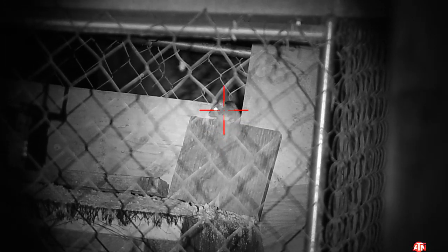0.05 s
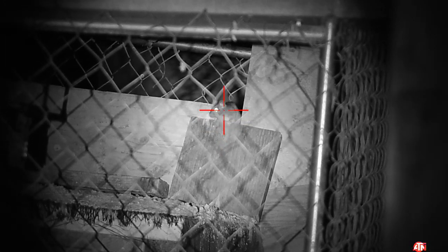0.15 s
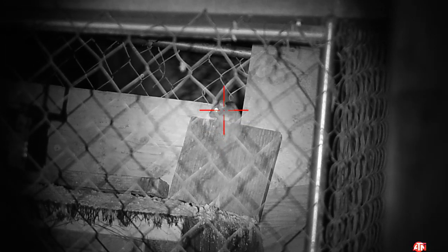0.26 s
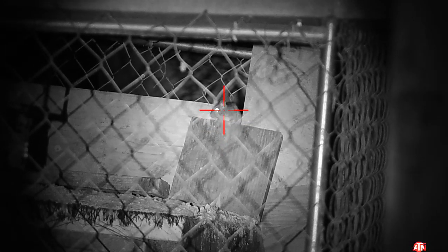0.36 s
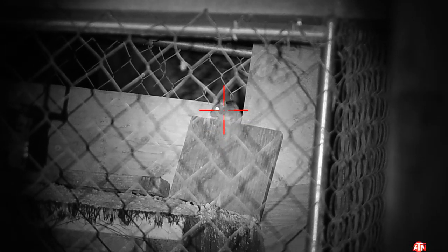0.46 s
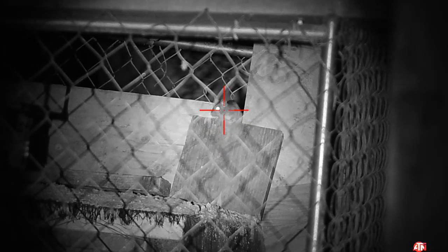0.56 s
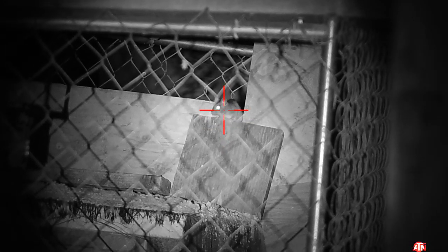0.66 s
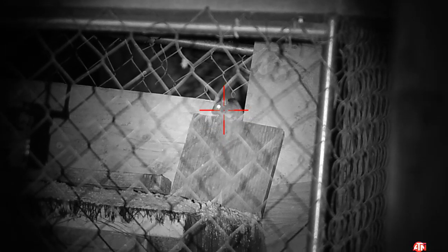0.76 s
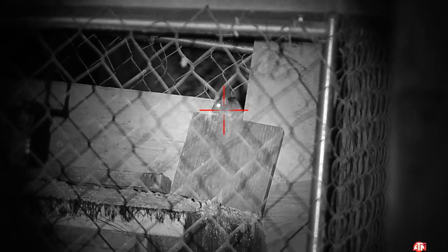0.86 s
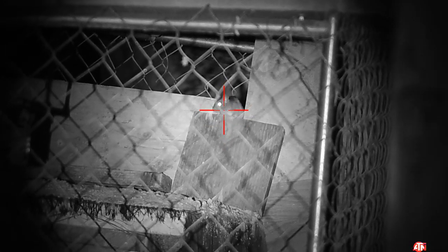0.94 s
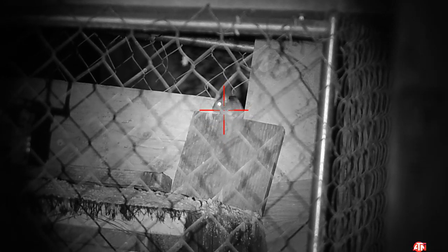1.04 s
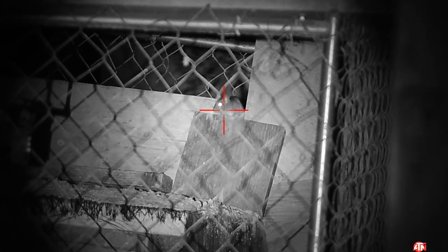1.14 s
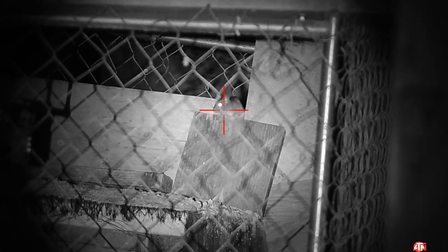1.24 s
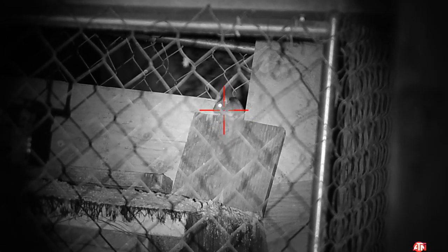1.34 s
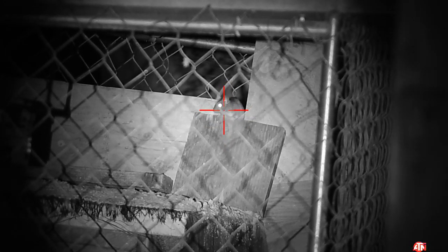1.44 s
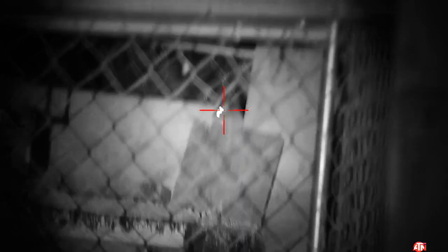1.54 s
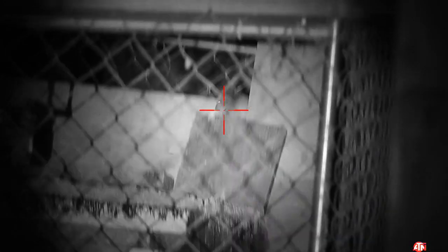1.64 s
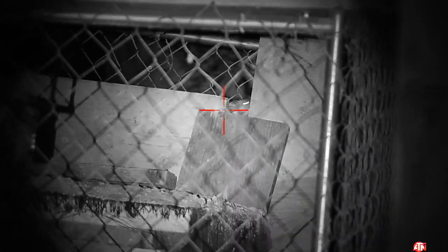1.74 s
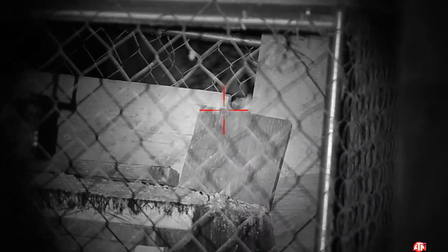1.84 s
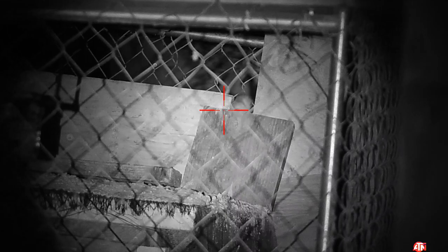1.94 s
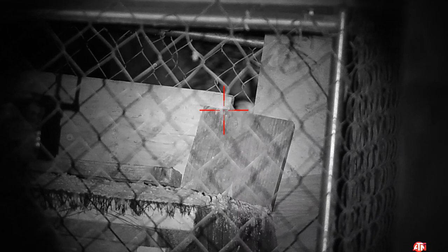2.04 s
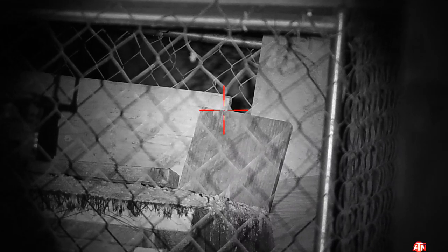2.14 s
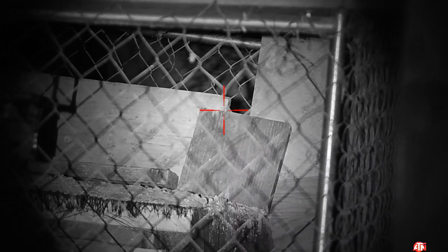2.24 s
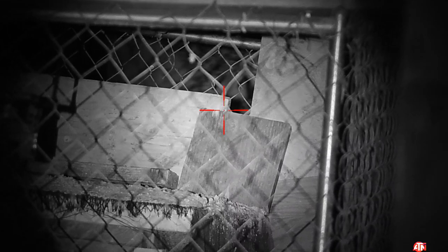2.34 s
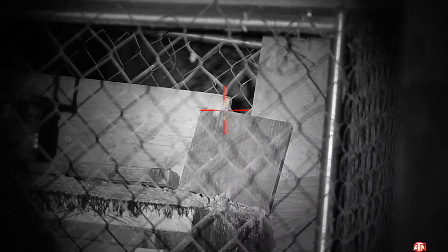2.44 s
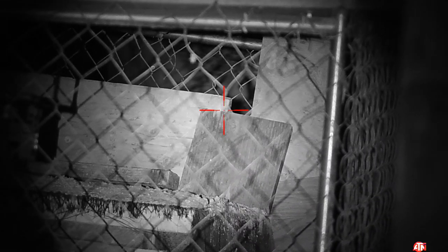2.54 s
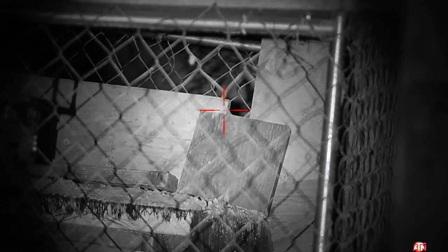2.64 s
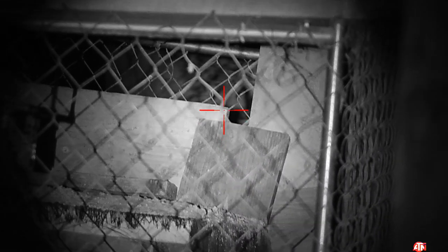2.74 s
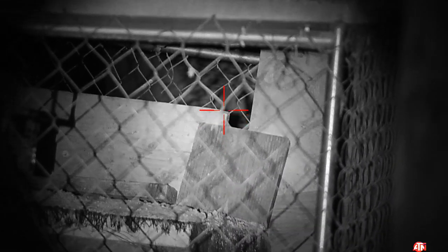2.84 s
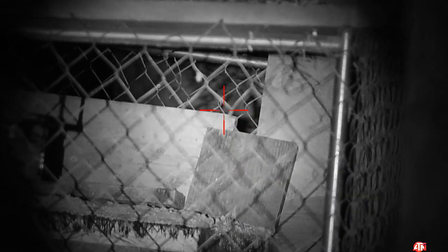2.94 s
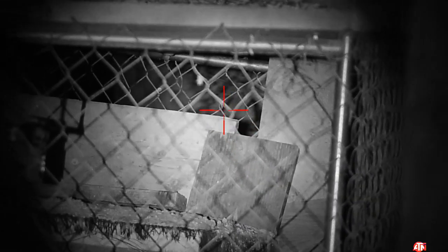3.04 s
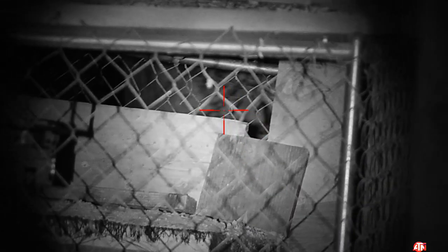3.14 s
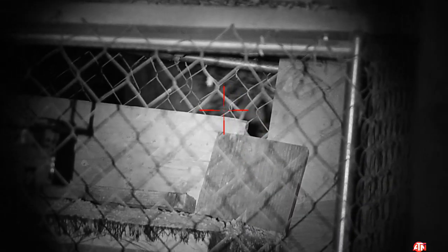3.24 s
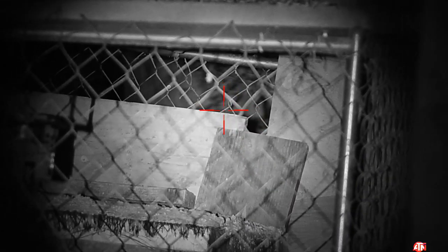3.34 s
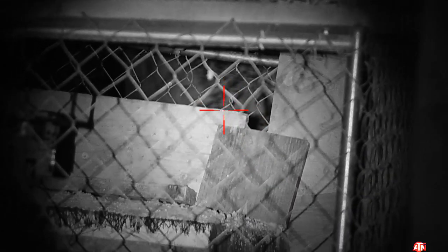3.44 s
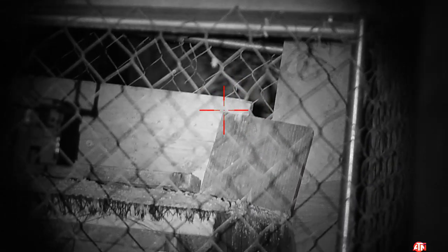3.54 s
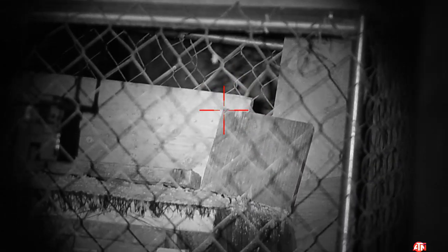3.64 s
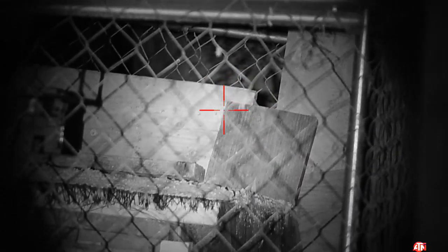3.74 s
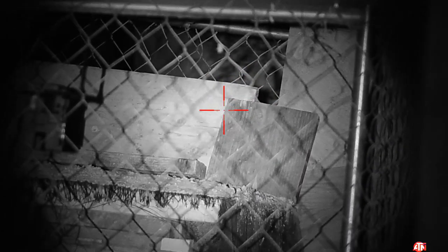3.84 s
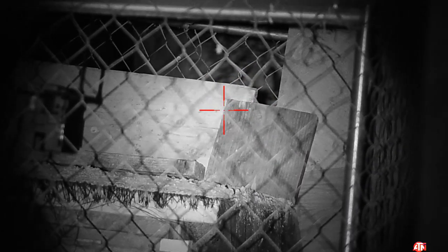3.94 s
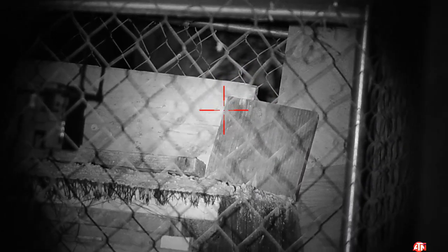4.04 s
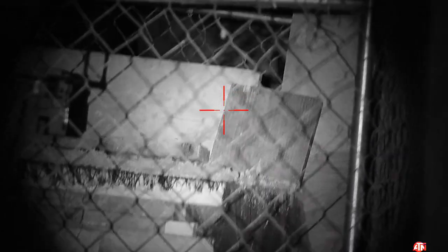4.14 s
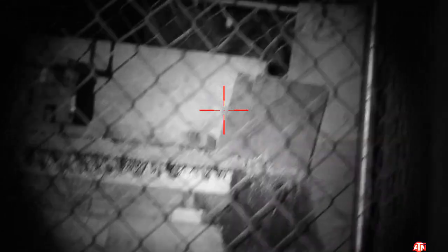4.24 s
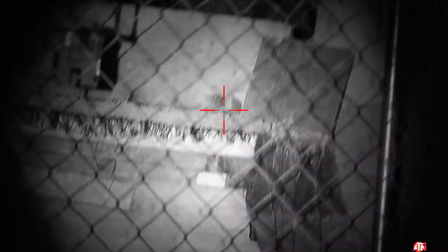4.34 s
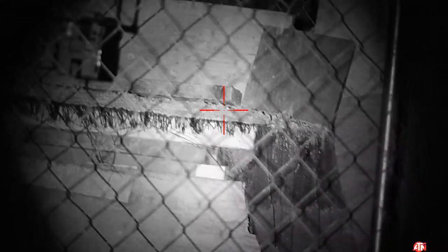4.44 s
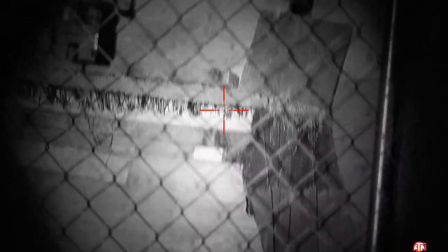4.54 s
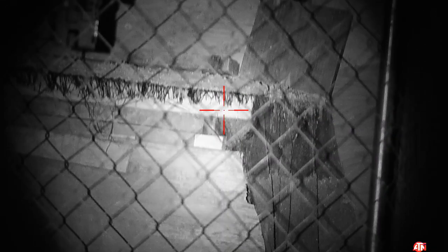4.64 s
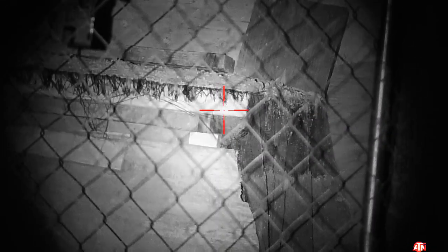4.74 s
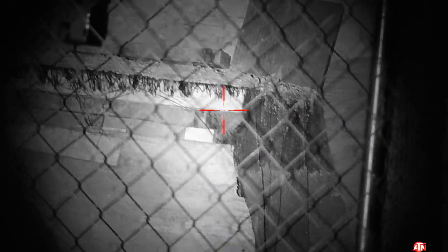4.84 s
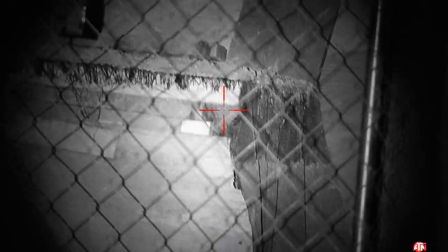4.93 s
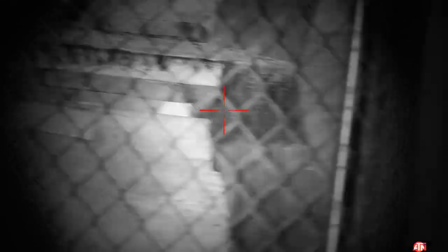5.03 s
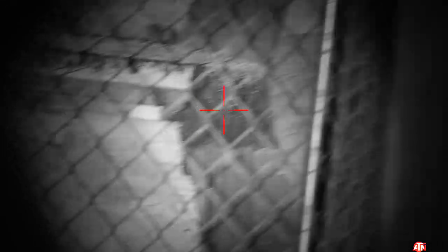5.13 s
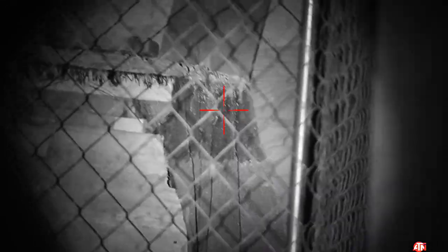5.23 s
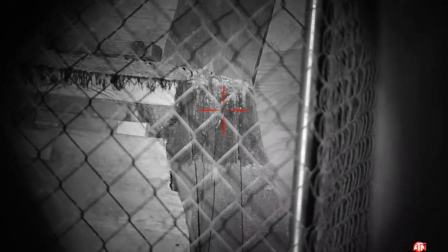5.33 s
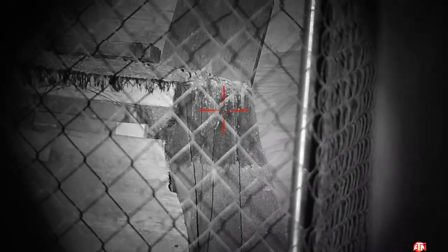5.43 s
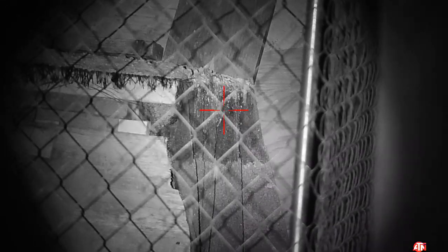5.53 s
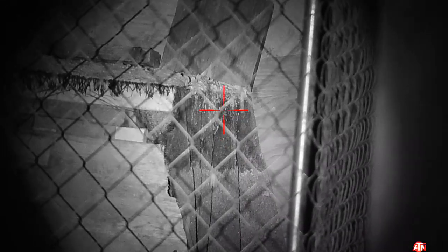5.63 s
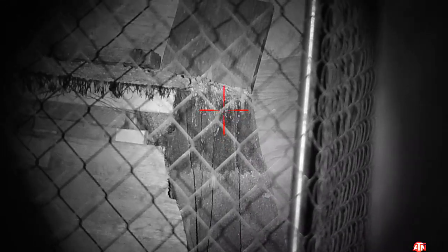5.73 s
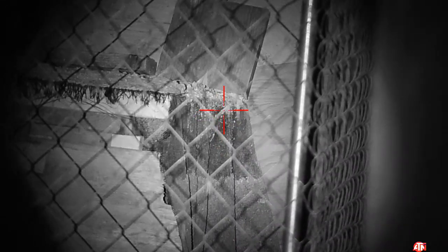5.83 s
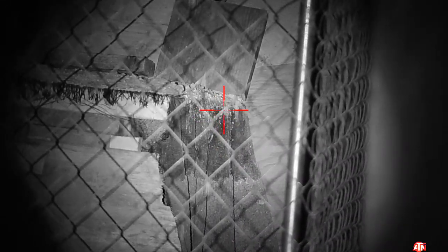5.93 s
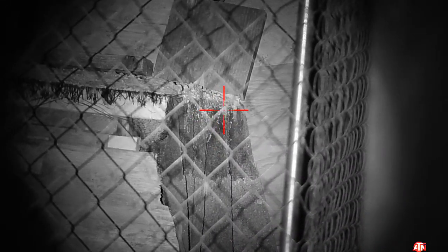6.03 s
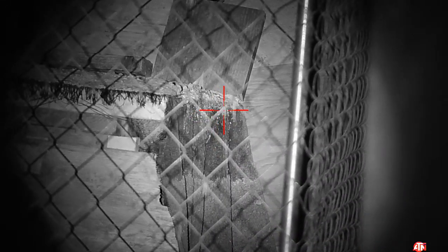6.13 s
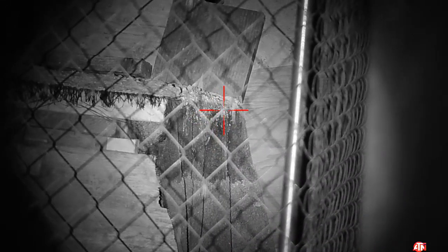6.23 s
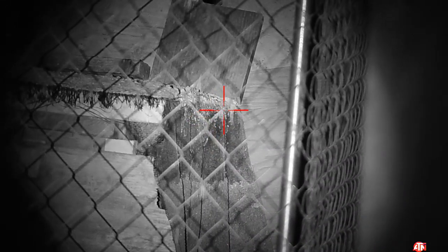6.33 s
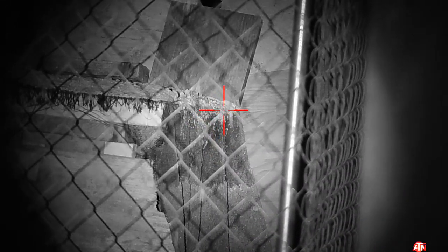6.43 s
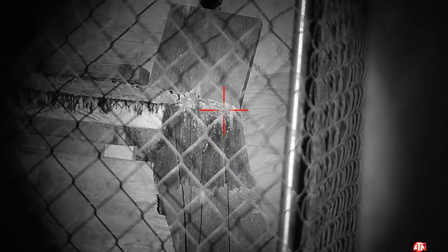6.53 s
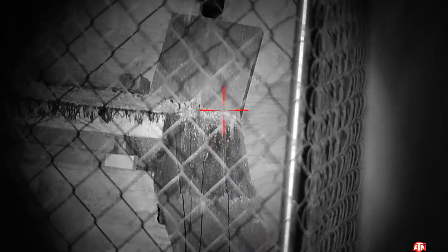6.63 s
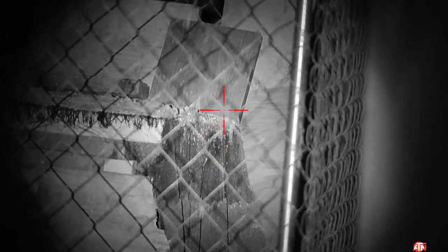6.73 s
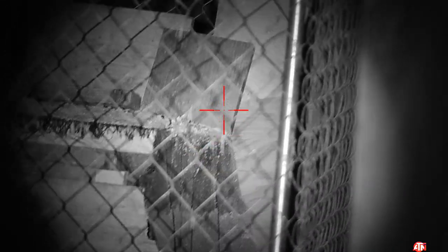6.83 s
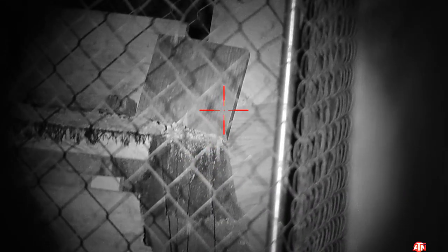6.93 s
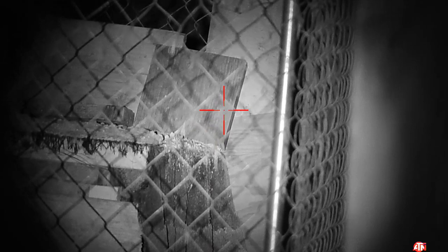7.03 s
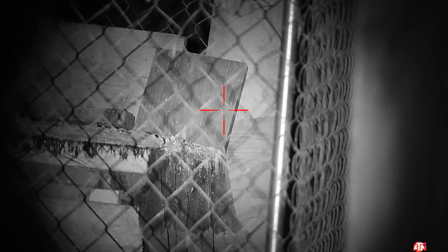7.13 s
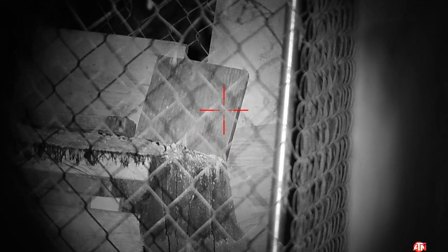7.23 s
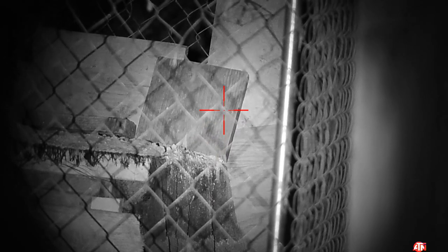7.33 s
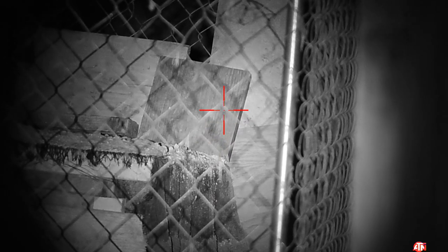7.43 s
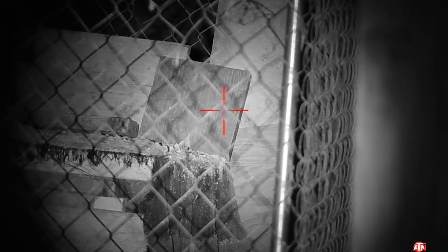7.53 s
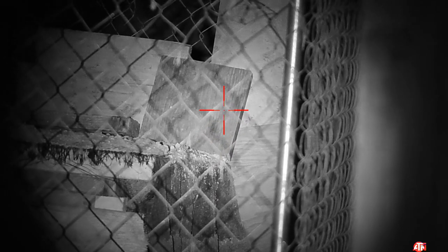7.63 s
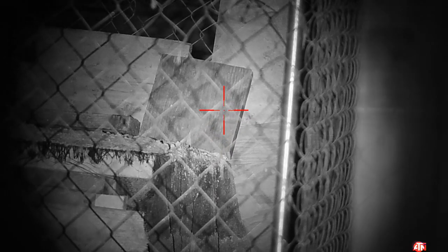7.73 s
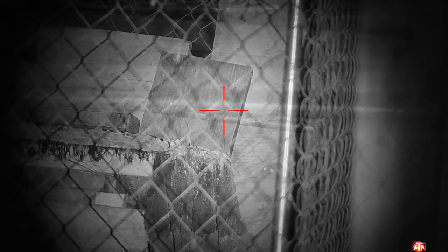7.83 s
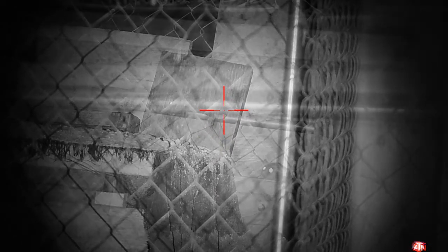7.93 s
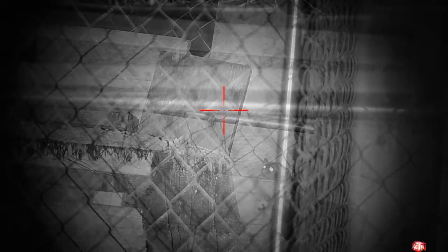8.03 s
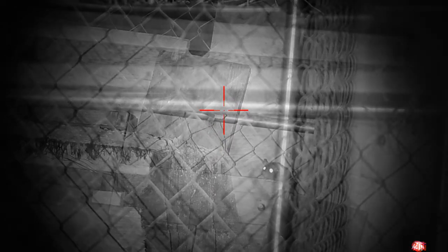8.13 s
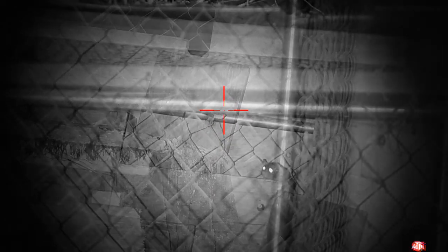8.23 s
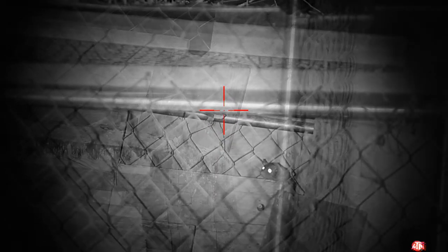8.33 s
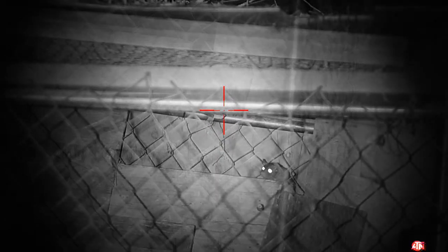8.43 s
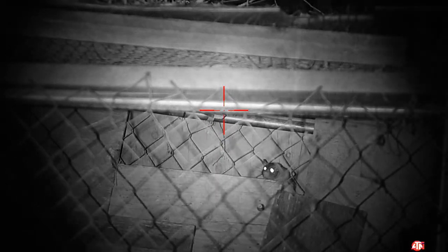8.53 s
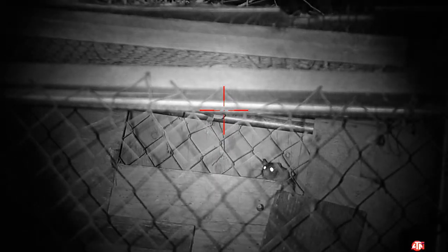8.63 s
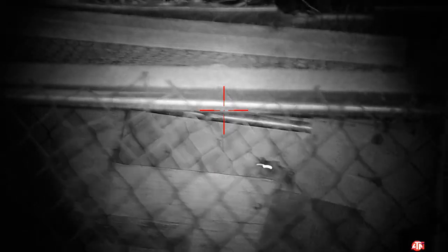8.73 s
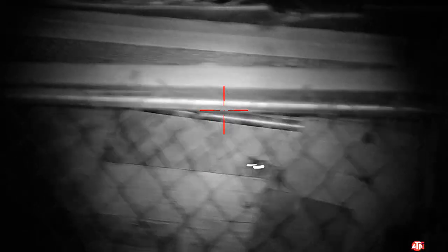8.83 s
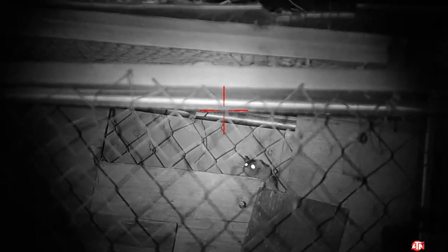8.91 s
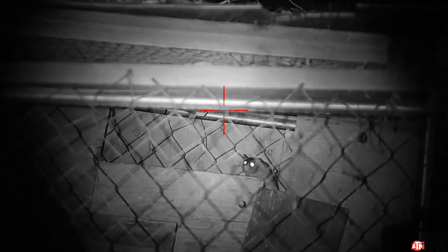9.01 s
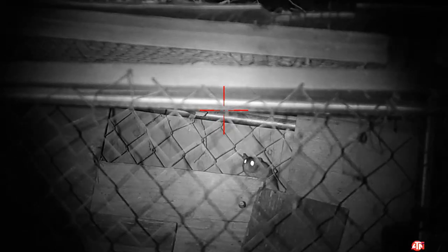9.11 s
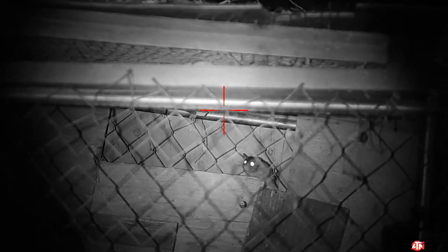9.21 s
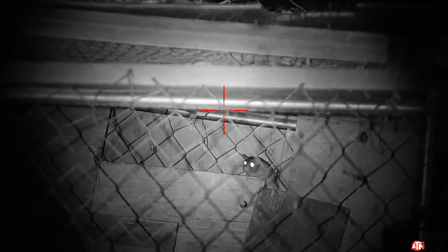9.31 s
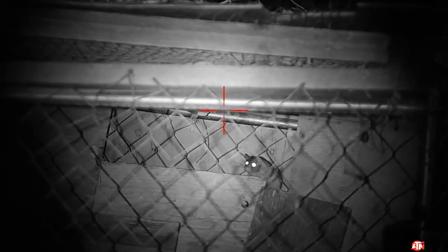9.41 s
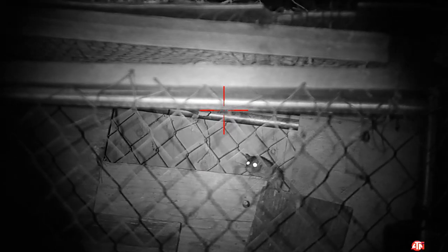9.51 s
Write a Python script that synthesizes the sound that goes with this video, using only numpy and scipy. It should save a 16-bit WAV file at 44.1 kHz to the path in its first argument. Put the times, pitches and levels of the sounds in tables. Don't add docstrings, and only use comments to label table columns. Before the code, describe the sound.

A farm yard at night, full of insects from start to finish, about 9.5 seconds. Crickets give short, bright, toned chirps at various distances; high trills run unbroken, a lower tree cricket pulses roughly every 0.4 seconds, and katydids rasp in dry, even, hissy strokes. Tiny handling taps occur at 0.2 to 0.6 seconds. A faint trigger creep and squeak at 1.65 lead to a single close air rifle shot at 1.71: a hard, bassless, metallic snap, with spring rattle until about 1.77. The microphone's limiter chops it short, then opens: echo and wall slaps swell around 2.1 with low and higher metallic ringing, and a weak ricochet whine at 2.3. By 2.7 the echo is gone. Insects continue over soft hiss and a distant blurred chorus, with faint low bumps and breeze near 5.2 and 5.8, and stronger nearby cricket chirps around 8.4 and 9.3.

```python
import sys
import numpy as np
from scipy import signal
from scipy.fft import rfft, irfft
from scipy.io import wavfile

SR = 44100
rng = np.random.default_rng(int(sys.argv[2]) if len(sys.argv) > 2 else 0)


def wav_out(sig):
    wavfile.write(sys.argv[1], SR, np.round(np.clip(np.atleast_2d(sig).T, -1, 1) * 32767).astype(np.int16))


def how_loud(loudness_db):
    steps = np.asarray(loudness_db, float) / 20
    return 10 ** steps


N = 422037

# (time [s], peak level [dB], pitch [Hz], t60 [s], noise share [0-1])
SHOT_BLOWS = [(1.7106, -17, 6600, 0.006014, 0.7), (1.7106, -19, 3700, .006, .6),
              (1.7135, -15, 3250, .008, .4), (1.7119, -8, 746, 0.0066, .05),
              (1.7122, -9.5, 1420, 0.0047, 0), (1.7124, -12.5, 5750, 0.0073, .2),
              (1.7126, -11.5, 2500, .006, .4), (1.713, -10.5, 4150, .015, .1),
              (1.7121, -8.5, 4900, 0.017, 0.33), (1.7128, -8, 7360, .008, .05),
              (1.714, -9, 7360, .007, .05), (1.7123, -16, 9700, 0.016, 1), (1.7188, -19.5, 750, 0.0082, .1),
              (1.7184, -15.5, 3200, .01, 0.7), (1.7182, -11, 4300, 0.0087, .15),
              (1.7196, -15, 4400, .009, .15), (1.719, -19, 1750, .007, .3), (1.7128, -17.5, 2100, .007, .4),
              (1.7134, -13.5, 5900, .008, .3), (1.7184, -10, 5740, 0.0073, 0), (1.7184, -23, 8800, .01, .9)]
# (time [s], peak level [dB])
SPRING_RATTLES = [(1.731, -31), (1.739, -27), (1.745, -31), (1.75, -27), (1.755, -26), (1.76, -27),
                  (1.767, -32), (1.7692, -30), (1.7712, -30), (1.7732, -30)]
# (time [s], peak level [dB], pitch [Hz],
# t60 [s], noise share [0-1])
HANDLING_TAPS = [(1.922, -29, 4380, .02, .4), (1.764, -32, 5900, .012, .7), (.192, -49, 2040, .022, .4),
                 (.192, -54, 1100, .022, .4), (.192, -54, 2850, .015, .6), (.206, -59, 1100, .03, .4),
                 (.205, -61, 1800, .025, .5), (.223, -62, 1100, .02, .6), (.461, -62, 1000, .025, .5),
                 (.562, -65, 1000, .03, .5), (.555, -64, 2800, .02, .9), (.442, -61, 1000, .035, .6),
                 (.442, -60, 2020, .03, .8), (.55, -64, 2000, .071, .95), (.002, -63, 1510, .037, .4),
                 (2.611, -58, 400, .078, .95), (5.145, -52.5, 120, .1, .1), (5.17, -51, 70, .2, .2),
                 (5.24, -49, 70, .11, .05), (5.83, -55, 75, .14, .15)]
# start and end (time [s]), (pitch [Hz])
SEAR_S = [1.663, 1.71]
SEAR_HZ = [2930, 3200]
# start and end (time [s]), (pitch [Hz])
RICOCHET_S = [2.285, 2.385]
RICOCHET_HZ = [2220, 2530]
# (time [s], level [dB])
LIMITED_ECHO = [(1.737, -66), (1.772, -61.5), (1.8, -74), (1.85, -64.5), (1.98, -57), (2.12, -51.5),
                (2.2, -52.5), (2.45, -66.5), (2.75, -88)]
# (frequency [Hz], density [dB per Hz])
ECHO_SPECTRUM = [(200, -30), (320, -5.5), (1000, -5), (2500, 0), (4700, .5), (5400, -13), (7000, -34),
                 (9000, -32.5), (12000, -50.5)]
# (time [s], peak level [dB], pitch [Hz], t60 [s], noise share [0-1])
WALL_SLAPS = [(1.84, -48, 3360, .03, .9), (1.879, -46, 2600, .04, 0.8), (1.879, -42, 4200, 0.044, .95),
              (2.054, -46, 2580, .025, 0.7), (2.097, -45, 2640, .025, .8), (2.122, -41, 2900, 0.019, .9),
              (2.122, -39, 1500, .03, .7), (2.165, -40, 1900, .03, .8), (2.21, -42, 3000, .06, 0.4),
              (2.298, -48, 1200, 0.024, 0.8)]
# (pitch [Hz], level over echo [dB], damped from [s], damping [dB per s])
METAL_RINGS = [
    (378, -3, 2.045, 598),
    (1018, 2.5, 2.14, 26),
]

# (first stroke [s], strokes [count], peak level [dB], pitch [Hz])
LOW_CHIRPS = [(.462, 2, -39, 4680), (.931, 2, -40, 4670), (1.025, 1, -40.5, 4640), (1.866, 2, -40, 4680),
              (2.312, 3, -39, 4680), (2.783, 3, -39, 4680), (3.233, 3, -40, 4650), (3.854, 3, -39, 4680),
              (4.64, 3, -37.5, 4690), (5.189, 3, -39.5, 4700), (5.801, 2, -39, 4690), (6.253, 2, -39, 4670),
              (6.77, 3, -39, 4670), (7.863, 3, -40, 4690), (7.966, 1, -39.5, 4660), (8.352, 2, -38, 4700),
              (8.814, 3, -38.5, 4680)]
BRIGHT_CHIRPS = [(.372, 2.5, -41.5, 4800), (1.238, 5, -41, 4810), (3.588, 2, -43.5, 4800),
                 (4.941, 1.7, -42.5, 4830), (5.571, 1.9, -42.5, 4780), (5.68, 1, -45, 4760),
                 (7.13, 2, -43.5, 4730), (7.997, 1.46, -44, 4730), (8.98, 1.66, -44.5, 4700)]
HIGH_CHIRPS = [(.154, 2.5, -43.5, 4800), (.309, 1, -50, 4870), (.529, 2.9, -44, 4820), (.765, 1, -53, 4930),
               (.86, 1.9, -43, 4820), (1.678, 1, -52, 4940), (1.968, 1.2, -43.5, 5000), (2.6, 2, -49, 4880),
               (2.709, 1, -50, 4930), (3.399, 2, -50.5, 4810), (3.783, 2, -49, 4780), (4.074, 1, -51, 4900),
               (4.406, 1, -53, 5000), (4.771, 2, -52, 4830), (4.91, 1, -51.5, 4730),
               (5.054, 1.8, -36.5, 4880), (5.362, 1, -54, 4840), (5.928, 2, -49, 4880),
               (6.375, 2, -47.5, 4970), (7.297, 2, -50.5, 4870), (7.598, 2, -46, 4970),
               (7.69, 1, -39, 4860), (7.801, 1, -53, 5000), (8.322, 1, -50, 4950), (8.436, 1.9, -37, 4870),
               (8.772, 1, -51.5, 4960), (8.947, 1, -48, 4880), (9.249, 1, -47, 4850),
               (9.291, 1.62, -35, 4890)]
FAINT_CHIRPS = [(.06, 2, -51.5, 4880), (.66, 3, -56, 4760), (1.55, 3, -55, 4740), (2.46, 2, -65, 4850),
                (2.925, 3, -55, 4780), (3.112, 3, -55, 4980), (3.35, 2, -48.5, 5050), (4.032, 1, -53, 4900),
                (4.125, 1, -53, 4790), (4.217, 3, -54, 4770), (4.365, 1, -58, 4950), (4.452, 2, -61, 4980),
                (5.403, 2, -54, 5050), (5.878, 1, -52, 5030), (6.06, 2, -58, 5000), (6.325, 1, -51, 5030),
                (6.47, 2, -55, 4680), (6.78, 3, -49.5, 4980), (6.92, 2, -54, 4800), (7.102, 1, -51, 4680),
                (7.225, 4, -51.5, 5010), (7.75, 3, -55, 4900), (8.11, 3, -54.5, 4670),
                (8.275, 1, -52, 4980), (8.52, 3, -56.5, 4780), (8.73, 1, -54, 4980), (8.82, 4, -55, 5050),
                (9.135, 3, -54, 4760), (9.38, 2, -57, 4880)]
# (gap [s], slowing [s per stroke], swell [dB per stroke], first stroke higher [Hz],
# sag share [1], overtone [dB])
CHIRP_HABITS = [
    (.0395, .004, .6, 60, .6, -34),
    (.044, .001, 1.8, 0, 1.15, -13),
    (.043, 0, 2.5, 0, 1.1, -34),
    (.045, 0, 0, 0, 1, -34),
]
# (delay [s]), (level [dB])
REPEAT_S = [.0195, .031]
REPEAT_DB = [-12, -16]

# (start [s], strokes [count])
TREE_CHIRPS = [(-.04, 8), (.343, 8), (.72, 8), (1.098, 5), (1.433, 8), (1.823, 8), (2.214, 8), (2.603, 5),
               (2.931, 8), (3.324, 8), (3.728, 7), (4.086, 8), (4.468, 8), (4.848, 8), (5.228, 8),
               (5.621, 8), (5.995, 8), (6.371, 8), (6.742, 8), (7.114, 8), (7.482, 8), (7.865, 8),
               (8.269, 8), (8.642, 8), (9.016, 8), (9.396, 8)]
SKIPPED_S = [.428, 6.456, 7.482]
# (pitch [Hz], fall [Hz], sounding share of period [0-1], level [dB], overtone [dB])
TRILL_VOICES = [(6156, 480, .62, -49, -41), (3941, 160, 0.66, -50.5, -20), (7000, 140, 0.4, -58, -42),
                (7273, 100, 0.25, -60.5, -40.5)]
# (rate [strokes per s], strokes at 0 s [count], drift [strokes], drift period [s],
# most ahead [s])
TRILL_PACES = [(80, .5, .36, 8.4, 6.8), (49.51, .14, .2, 7.8, 5.7), (12.7, .43, .25, 6.5, 5.3),
               (12.92, .45, .27, 8.5, 3.1)]
# (phase slip per stroke [turns], pitch wander [Hz])
TRILL_SLIPS = [(.19, 9), (.14, 7), (.19, 9), (.19, 9)]

# (first [s], last [s], rasps [count])
RASP_PHRASES = [(.059, .21, 3), (.299, .523, 4), (.608, .984, 6), (1.08, 1.174, 2), (1.231, 1.532, 5),
                (1.616, 1.934, 5), (2.025, 2.248, 4), (2.283, 2.438, 3), (2.52, 2.594, 2),
                (2.676, 2.823, 3), (2.912, 3.138, 4), (3.223, 3.391, 3), (3.493, 3.727, 4),
                (3.794, 4.26, 7), (4.352, 4.76, 6), (4.865, 4.941, 2), (4.91, 5.353, 7), (5.401, 5.401, 1),
                (5.508, 5.732, 4), (5.824, 6.12, 5), (6.192, 6.492, 5), (6.56, 6.935, 6), (7.013, 7.229, 4),
                (7.305, 7.612, 5), (7.686, 7.902, 4), (7.997, 8.097, 2), (8.16, 8.682, 8), (8.749, 8.98, 4),
                (9.053, 9.505, 7)]
# (time [s], level [dB])
RASP_UNISON = [(0, -48), (.5, -52.5), (.95, -50.5), (1.15, -55), (1.4, -49.5), (2.25, -54.5), (2.8, -49),
               (3.6, -52), (3.9, -53), (4.2, -50), (4.8, -54), (5.1, -50.5), (5.9, -49.5), (6.65, -54.5),
               (7.4, -49.5), (8.5, -50), (8.82, -52.5), (9.28, -46.5)]
WEAK_RASPS_S = [.76, 1.23, 1.62, 2.68, 3.95, 4.43, 4.52, 4.91, 4.98, 5.4, 6.71, 7.84, 8.1, 8.16, 8.9, 8.98,
                9.43, 9.505]
# (time [s], level [dB])
NEAR_RASPS = [(0.228, -53), (0.395, -57.3), (1.848, -58), (2.116, -57.2), (2.453, -54.5), (2.718, -57.9),
              (2.823, -52), (2.877, -55.1), (2.96, -55.2), (3.04, -56.7), (3.471, -56.9), (3.659, -56.9),
              (4.331, -56.8), (4.7, -56), (4.837, -57.2), (5.128, -51.8), (5.225, -52), (5.299, -58.0),
              (5.427, -54.9), (5.744, -52), (5.971, -52.4), (6.072, -56.0), (6.151, -56.7), (6.239, -55.2),
              (6.341, -54), (6.412, -52), (6.601, -56.3), (6.844, -56.6), (7.039, -56.9), (7.107, -57),
              (7.281, -57.9), (7.356, -55.7), (7.725, -57.0), (7.798, -58.0), (8.011, -57.3),
              (8.265, -56.6), (8.448, -55.5), (8.529, -55), (8.79, -57.5), (9.039, -59), (9.298, -55.1),
              (9.377, -54.2), (9.458, -53), (9.537, -53.0)]
# (end [s], level [dB])
SWELLING_BUZZES = [(2.96, -66), (3.1, -63), (3.24, -63), (3.37, -60), (3.51, -60), (3.649, -60.5)]
# (frequency [Hz], density [dB per Hz])
RASP_SPECTRUM = [(6000, -50.5), (8600, -16), (9800, -6), (11000, -1.5), (13500, 0), (15700, -2.5)]

# (pitch [Hz], width [Hz], level [dB])
FAR_CHORUS = [(2550, 120, -76), (3770, 270, -64.5), (3990, 130, -71), (4800, 330, -69.5),
              (5660, 430, -62.5), (6260, 330, -64.5), (7015, 300, -67), (8086, 323, -75)]
# (time [s]), (level [dB])
JOINING_S = [5.5, 9.3]
JOINING_DB = [-90, -72]
# (frequency [Hz], density [dB per Hz])
AIR_SPECTRUM = [(18, -75.5), (50, -29.5), (112, -9.5), (200, -20.5), (400, -27), (2200, -32), (5000, -27.5),
                (16000, -30.5)]
# (time [s], level [dB])
BREEZE_PUFFS = [(0, -100), (1.2, -83), (1.4, -75), (1.6, -100), (5.05, -100), (5.2, -70.5), (5.6, -80),
                (6.3, -81.5), (7., -97), (8.1, -77), (8.6, -97), (9.399, -83)]


def evened(x):
    return x / np.sqrt(np.mean(x ** 2) + 1e-20)


def add(mix, start_s, sound):
    start = round(start_s * SR)
    part = mix[max(start, 0):][:max(len(sound) + min(start, 0), 0)]
    part += sound[max(-start, 0):][:len(part)]


def coloured(spectrum):
    f, db = np.transpose(spectrum)
    hz = np.fft.rfftfreq(N, 1 / SR)
    gain = how_loud(np.interp(np.log(hz + 1), np.log(f), db))
    return evened(irfft(rfft(rng.standard_normal(N)) * gain, N))


def band(hz, width_hz, size=N):
    bell = np.exp(-.5 * ((np.fft.rfftfreq(size, 1 / SR) - hz) / width_hz) ** 2)
    return evened(irfft(rfft(rng.standard_normal(size)) * bell, size))


def knocks(blows, rise_share=.078):
    out = np.zeros(N)
    for s, db, hz, t60_s, noise in blows:
        rise_s = rise_share * t60_s
        t = np.arange(0, rise_s + t60_s, 1 / SR)
        shape = np.minimum(t / rise_s, 1) * how_loud(-60 * np.maximum(t - rise_s, 0) / t60_s)
        rattle = .7 * band(hz, .15 * hz, size=16384)
        tick = .3 * band(1.3 * hz, .6 * hz, size=16384)
        mode = np.sin(2 * np.pi * hz * t)
        add(out, s, how_loud(db) * shape * ((1 - noise) * mode + noise * (rattle + tick)[:len(t)]))
    return out


def glide(span_s, span_hz, db):
    t = np.arange(N) / SR
    u = np.clip((t - span_s[0]) / (span_s[1] - span_s[0]), 0, 1)
    turns = np.cumsum(np.interp(t, span_s, span_hz) + 40 * band(60, 40)) / SR
    shape = np.sqrt(np.abs(np.sin(np.pi * u)))
    return how_loud(db + 2.5 * band(50, 30)) * shape * np.sin(2 * np.pi * turns)


def rifle_crack():
    ceiling = .68
    limited = ceiling * np.tanh(knocks(SHOT_BLOWS) / ceiling)
    return signal.sosfilt(signal.butter(4, 360, "high", fs=SR, output="sos"), limited)


def spring_rattle():
    rattles = [(s, db, 4446, .01, .3) for s, db in SPRING_RATTLES]
    ticks = [(s, db - 12, 6000, .007, .95) for s, db in SPRING_RATTLES]
    return knocks(rattles + ticks, rise_share=.16)


def yard_echo():
    clamp_s, even_s, dulling_db_per_s = 1.79, 2.226, 22.5
    t = np.arange(N) / SR
    echo_db = np.interp(t, *np.transpose(LIMITED_ECHO), -120, -120)
    opened = t > clamp_s
    dull_db = dulling_db_per_s * (t - even_s) * opened
    wash = coloured(ECHO_SPECTRUM) * how_loud(1.5 * band(30.3, 21.99))
    low = signal.sosfilt(signal.butter(2, 1500, fs=SR, output="sos"), wash)
    high = wash - low
    echo = how_loud(echo_db + np.minimum(dull_db, 12) + 10) * low + how_loud(echo_db + 9.5) * high
    rings = np.zeros(N)
    for hz, db, damped_s, db_per_s in METAL_RINGS:
        ring_db = echo_db + db - db_per_s * np.maximum(t - damped_s, 0)
        rings += how_loud(ring_db) * opened * np.sin(2 * np.pi * hz * t)
    trigger = how_loud(-48.5) * np.interp(t, [1.645, 1.7, 1.712], [0, 1, 0]) * low
    ricochet = glide(RICOCHET_S, RICOCHET_HZ, -54)
    sear = glide(SEAR_S, SEAR_HZ, -51)
    return echo + rings + trigger + knocks(WALL_SLAPS) + ricochet + sear


def katydids(far_db=-61, rise_s=.02995, fall_s=.03, late_s=-.001):
    offbeat_s, offbeat_from_db, offbeat_db = .042, -51.5, -58
    power, buzz = np.full(N, how_loud(2 * far_db)), np.zeros(N)
    rise, fall = round(rise_s * SR), round(fall_s * SR)
    shape = np.r_[np.hanning(2 * rise)[:rise], np.hanning(2 * fall)[fall:]]

    index = np.arange(len(shape))
    short_shape = np.interp(np.arange(0, len(shape), 1 / .76), index, shape)
    for s, db in NEAR_RASPS:
        add(power, s - .74 * rise_s, how_loud(2 * db) * short_shape ** 2)

    times = np.concatenate([np.linspace(*row) for row in RASP_PHRASES])
    levels = np.interp(times, *np.transpose(RASP_UNISON))
    levels -= 3 * (np.abs(times[:, None] - WEAK_RASPS_S).min(1) < .02)
    for s, db, luck in zip(times, levels, rng.standard_normal(len(times))):
        at = s + late_s - rise_s
        add(power, at, how_loud(2 * (db + .797 * luck)) * shape ** 2)
        gap_db = offbeat_db - 1.8 * max(db - offbeat_from_db, 0)
        add(power, at + offbeat_s, how_loud(2 * gap_db) * shape ** 2)

    for s, db in SWELLING_BUZZES:
        add(buzz, s - .09, how_loud(db) * np.linspace(0, 1, round(.09 * SR)))
    teeth = how_loud(1.1 * band(302.5, 199.5))
    rasp = np.sqrt(power) * evened(teeth * coloured(RASP_SPECTRUM))
    return rasp + buzz * (band(7970, 250) + .91 * band(9000, 700))


def stroke(u, hz, fall_hz, overtone_db, start=0, rise=.25, climb_hz=0, square=2):
    pitch = hz + fall_hz * (.35 - u ** 1.3) - climb_hz * np.exp(-u / .16)
    phase = 2 * np.pi * (np.cumsum(pitch) / SR + start)
    shape = np.minimum(u / rise, 1) * np.sqrt(np.clip(1 - u ** square, 0, 1))
    return shape * (np.sin(phase) + how_loud(overtone_db) * np.sin(2 * phase))


def field_crickets(far_chirps=70, far_db=-59.5):
    length_s, fall_hz, rise = .021, 480, .33
    out = np.zeros(N)
    u = np.arange(0, length_s, 1 / SR) / length_s
    low_u = np.linspace(0, 1, round(.019 * SR))
    groups = (LOW_CHIRPS, BRIGHT_CHIRPS, HIGH_CHIRPS, FAINT_CHIRPS)
    for chirps, (gap_s, slowing_s, swell_db, lift_hz, sag, overtone_db) in zip(groups, CHIRP_HABITS):
        low = chirps is LOW_CHIRPS
        wing = low_u if low else u
        for (s, strokes, db, hz), chance in zip(chirps, rng.random((len(chirps), 5))):
            for k in range(round(strokes)):
                at = s + k * gap_s + slowing_s * k * (k - 1) / 2 - .46 * length_s
                below_db = swell_db * (strokes - 1 - k)
                pitch = hz + 65 * low + lift_hz * (k == 0)
                tone = stroke(wing, pitch, sag * fall_hz, overtone_db - 2 * below_db, chance[k], rise,
                              climb_hz=300 * low, square=2 + 6 * low)
                sound = how_loud(db - .7 * low - below_db) * tone
                add(out, at - .001 * low, sound)
                for late_s, repeat_db in zip(REPEAT_S, REPEAT_DB):
                    echo = how_loud(repeat_db - 3 * (not low)) * sound
                    add(out, at + late_s + .002 * chance[4], echo)
    for at, pitch, near, start in rng.random((far_chirps, 4)):
        for k in range(3):
            tone = stroke(u, 4650 + 450 * pitch, fall_hz, -34, start)
            add(out, at * N / SR + .043 * k, how_loud(far_db + 6 * near) * tone)
    return out


def trill(pace, voice, steadiness):
    rate, first, drift, period_s, ahead_s = pace
    hz, fall_hz, share, db, overtone_db = voice
    slip, wander_hz = steadiness
    t = np.arange(N) / SR
    strokes = first + rate * t + drift * np.cos(2 * np.pi * (t - ahead_s) / period_s) + .5 * share + 1
    number = strokes.astype(int)
    strength, steps = rng.standard_normal((2, number.max() + 2))
    start = slip * np.cumsum(steps)
    u = np.minimum(strokes % 1 / share, 1)
    wander = wander_hz * np.interp(t, np.arange(40) / 4, rng.standard_normal(40))
    return how_loud(db + .7 * strength[number]) * stroke(u, hz + wander, fall_hz, overtone_db, start[number])


def tree_crickets(db=-58.5, period_s=.0213, answer_db=-69):
    out = np.zeros(N)
    u = np.linspace(0, 1, round(.0198 * SR))
    answer_u = np.linspace(0, 1, round(.015 * SR))
    for (s, count), chance in zip(TREE_CHIRPS, rng.random((len(TREE_CHIRPS), 32))):
        for k in range(count):
            at = s + k * period_s
            if np.min(np.abs(np.subtract(SKIPPED_S, at))) <= period_s / 2:
                continue
            level_db = db - .5 * (k == 0) + 2.2 * (chance[k + 23] - .5)
            add(out, at, how_loud(level_db) * stroke(u, 2535, 170, -44, chance[k], climb_hz=89, square=4))
        for k in range(7):
            at = s + count * period_s + .046 + .015 * chance[31] + k * period_s
            level_db = answer_db + 3.6 * chance[16 + k] - k / 2
            add(out, at, how_loud(level_db) * stroke(answer_u, 2620, 90, -40.5, chance[8 + k]))
    return out


def leaves(x, t60_s=.12):
    t = np.arange(200, 6000) / SR
    tail = rng.standard_normal(len(t)) * how_loud(-60 * t / t60_s)
    return signal.oaconvolve(x, np.r_[np.zeros(200), tail / np.linalg.norm(tail)])[:N]


def night_air():
    t = np.arange(N) / SR
    breeze = how_loud(np.interp(t, *np.transpose(BREEZE_PUFFS))) * band(48.04, 28)
    chorus = np.zeros(N)
    for hz, width_hz, db in FAR_CHORUS:
        chorus += how_loud(db + 1.3 * band(40, 34)) * band(hz, width_hz)
    chorus += how_loud(np.interp(t, JOINING_S, JOINING_DB)) * band(3220, 129.5)
    return how_loud(-67) * coloured(AIR_SPECTRUM) + chorus + breeze


def scene():
    rifle = rifle_crack() + spring_rattle() + knocks(HANDLING_TAPS) + yard_echo()
    trills = sum(trill(*row) for row in zip(TRILL_PACES, TRILL_VOICES, TRILL_SLIPS))
    steady = trills + tree_crickets()
    chirps = field_crickets()
    scatter = leaves(how_loud(-11) * steady + how_loud(-6.5) * chirps)
    return (rifle + katydids() + chirps + steady + scatter + night_air())[None]


def top_cut(x):
    return signal.sosfilt(signal.butter(12, 16350, fs=SR, output="sos"), x)


def record(dry):
    edge = signal.firwin(301, 15900, window=("kaiser", 4), fs=SR)
    mix = signal.oaconvolve(dry, edge[None], "same")
    return top_cut(mix)


dry = scene()
out = record(dry)
wav_out(out)
```